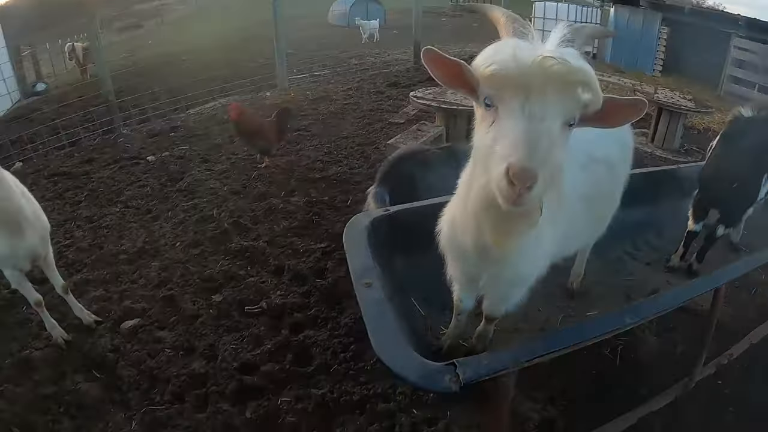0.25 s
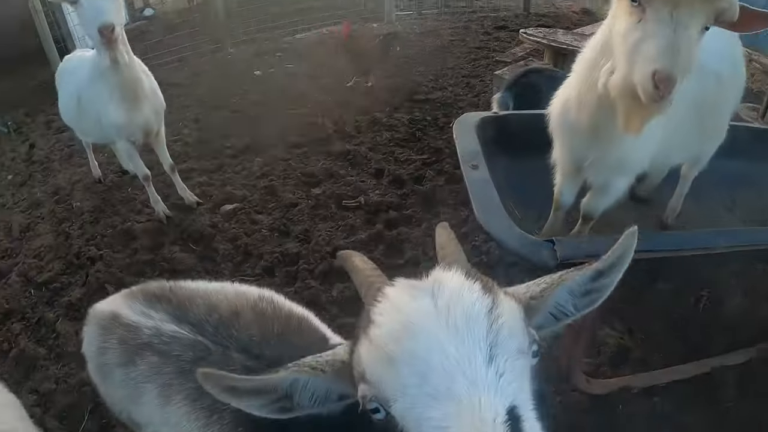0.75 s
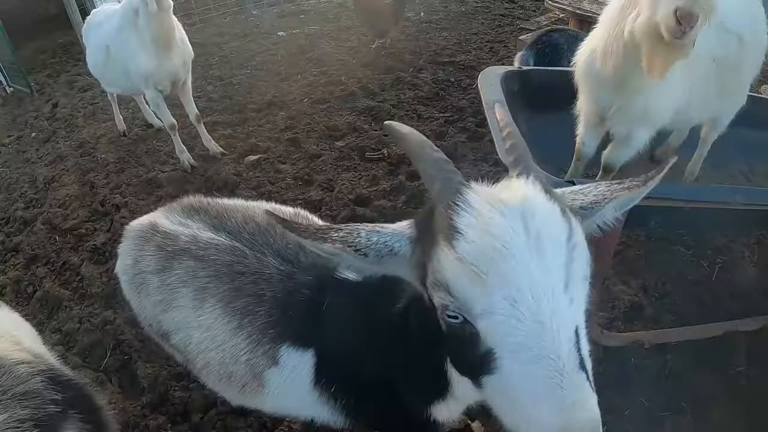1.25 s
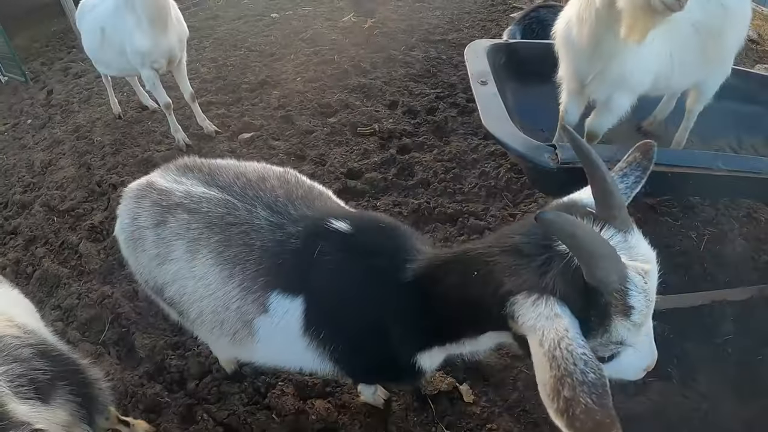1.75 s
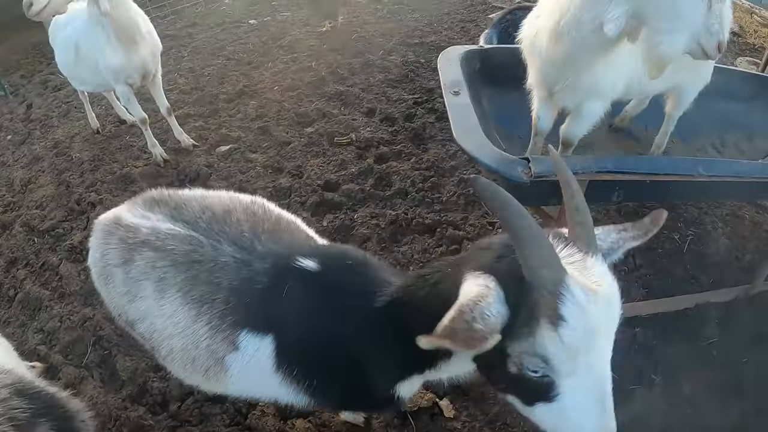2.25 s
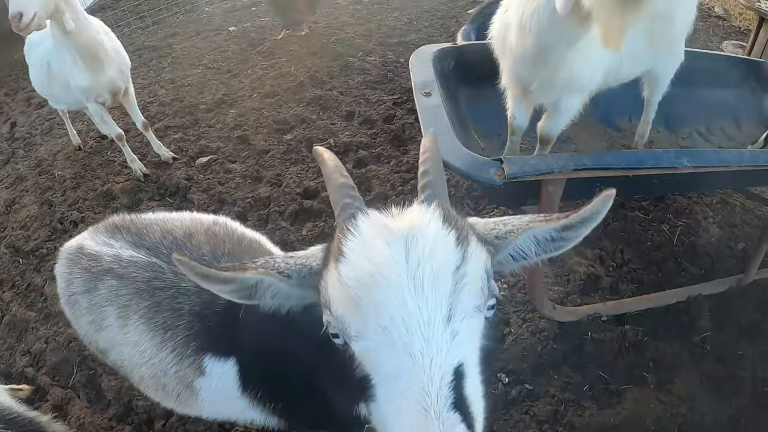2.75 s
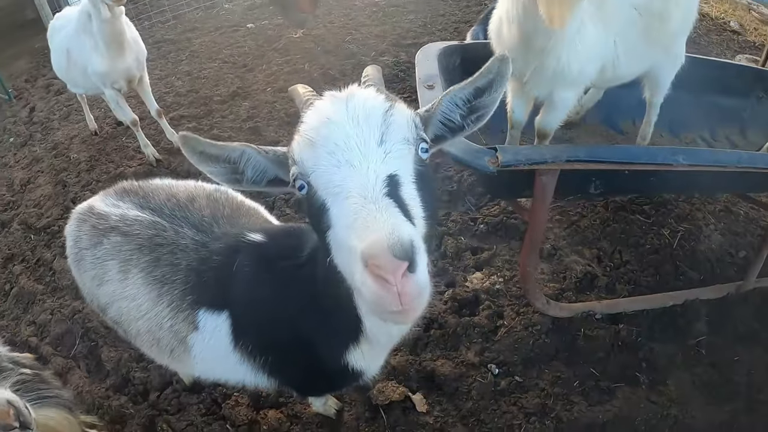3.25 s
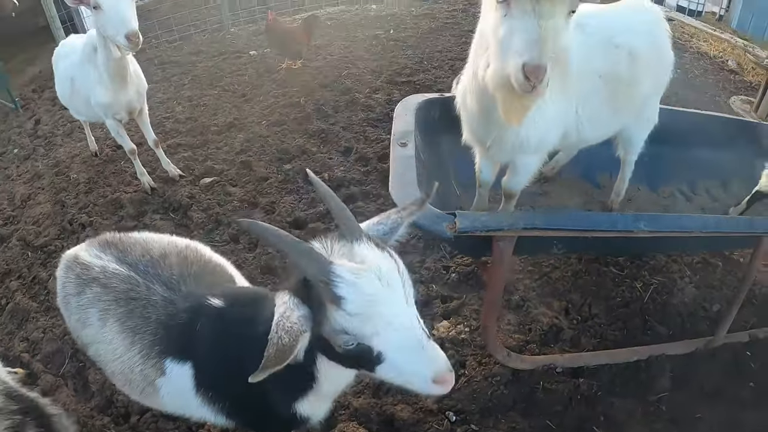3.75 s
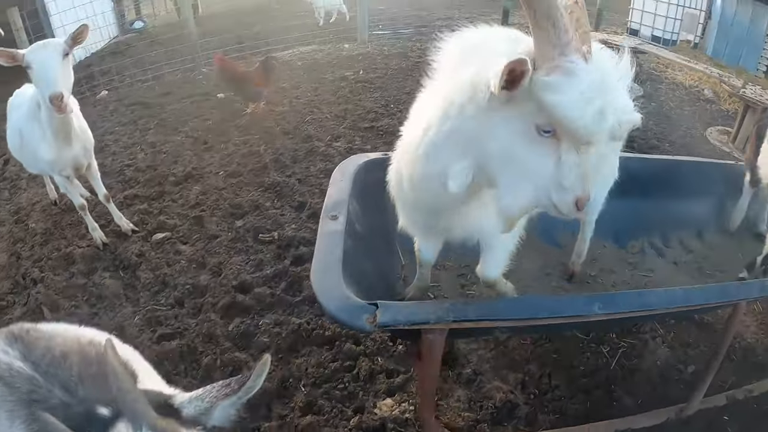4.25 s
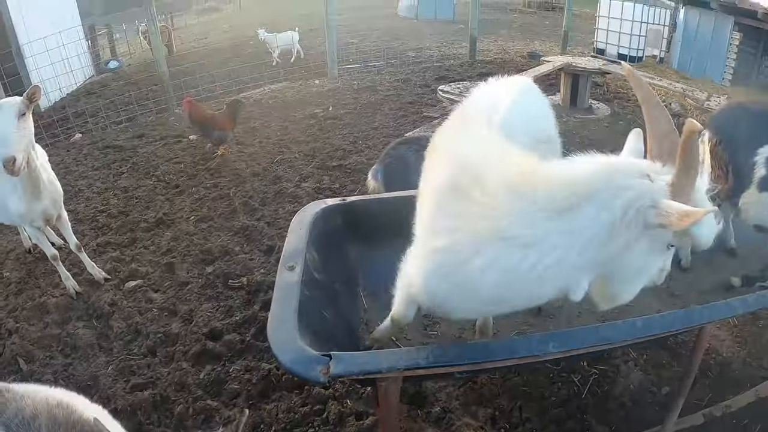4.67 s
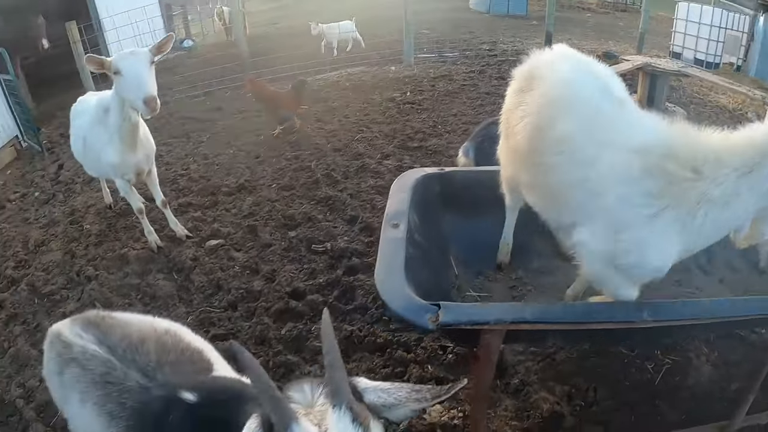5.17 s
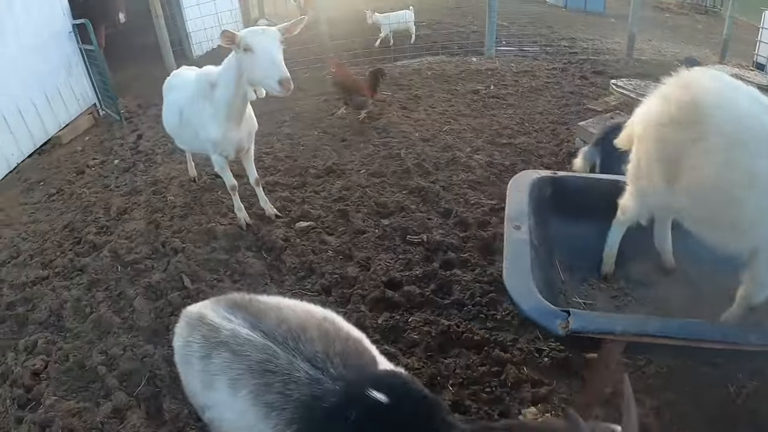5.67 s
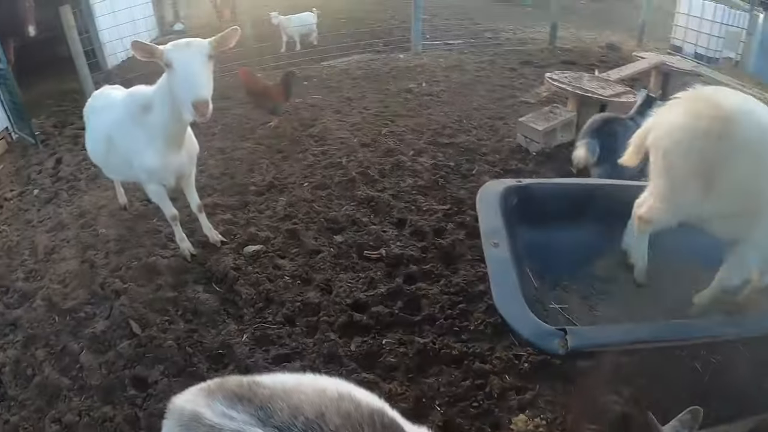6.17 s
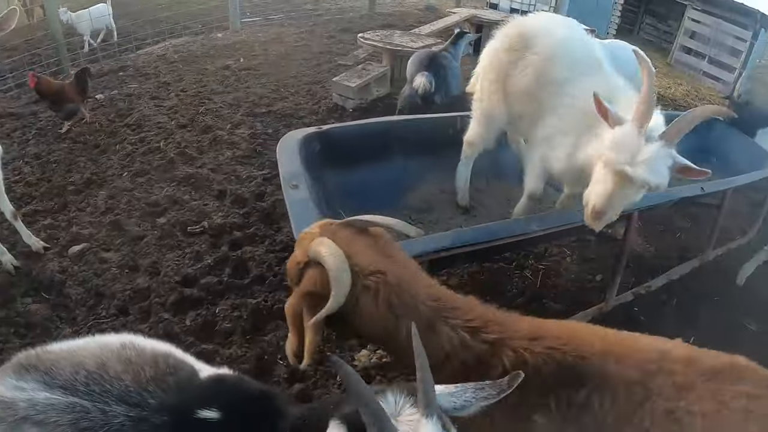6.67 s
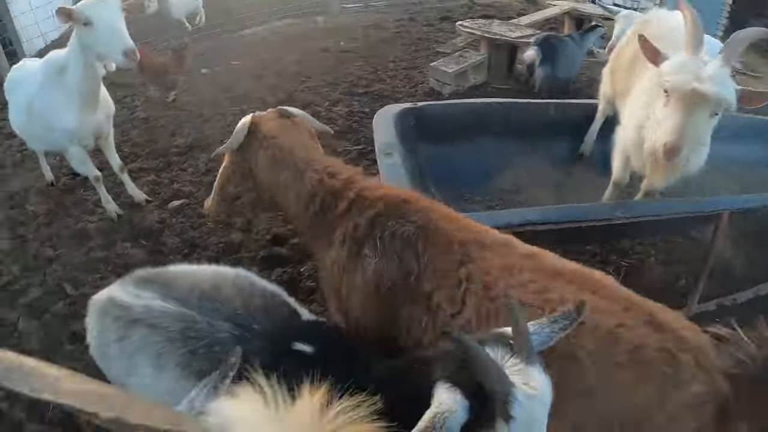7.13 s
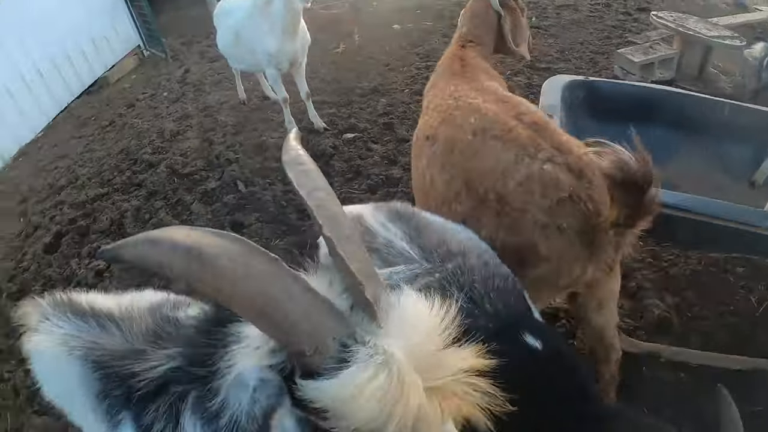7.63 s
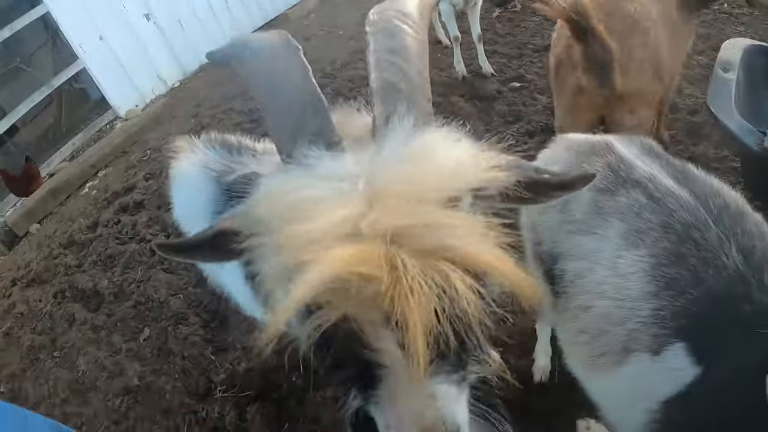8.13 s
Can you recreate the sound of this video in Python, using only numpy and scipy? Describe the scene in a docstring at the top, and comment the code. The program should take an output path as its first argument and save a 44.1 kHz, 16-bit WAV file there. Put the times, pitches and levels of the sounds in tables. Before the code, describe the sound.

Outdoors in a dirt yard with steady quiet air noise and barely any echo. A soft bleat at 0-0.35 s comes with tiny squeaks and a run of light plastic knocks until 0.9. From 0.45 to 1.3 a loud, raspy, strongly throbbing bleat rises very close, peaking near 0.85. A weaker nasal one follows to 1.75, then a hoarse stuttering bleat to 2.7, with knocks at 2.0 and 2.5. A clear, strong, steadier bleat swells at 3.2 and drops by 3.7; a short mutter leads to a shrill bleat at 4.0-4.5, then a soft shaky one to 5.4. Hooves thump the hollow trough from 4.3, strongly at 5.05, 5.45 and 6.35, with low rumble and dirt scuffs. At 6.5-7.5 a long, smoother bleat overlaps faint, rough distant ones. A booming knock at 7.75 rattles in slowing rebounds with clicks; two little squeaks at 8.0 and final knocks at 8.2 close.

```python
"""A soft bleat is heard first; then goats bleat in turn, near and farther off, about eleven throbs a second.
Each voice is a harmonic series with gated hiss, modulated in level and pitch and shaped by throat resonances.
Hooves strike a big plastic trough, a sum of decaying modes over dense noise, which booms and rumbles.
Scuffs in the dirt are clumped noise grains, squeaks are brief frequency-modulated tones,
and steady filtered noise is the open air."""
import sys
import numpy as np
from scipy import signal
from scipy.fft import rfft, irfft, next_fast_len
from scipy.io import wavfile
from scipy.ndimage import uniform_filter1d

SR = 44100
rng = np.random.default_rng(int(sys.argv[2]) if len(sys.argv) > 2 else 0)


def dump_mix(stems):
    """Bounce the given channels to the path in sys.argv[1] as a 16-bit WAV at rate SR."""
    frames = np.atleast_2d(stems).T  # one column per channel
    limited = np.clip(frames, -1, 1)  # hard clip at full scale
    pcm = np.round(limited * 32767).astype(np.int16)
    wavfile.write(sys.argv[1], SR, pcm)


N = 370440  # samples

# Course of each bleat through the crests of its throbs; throb depth is before the low-harmonic factor.
# Columns: t/s, f/Hz, level/dB, upper over lower harmonics/dB, throb depth/dB
OPENING_COURSE = [(0, 413, -42, -1, 9), (.16, 420, -39.5, -3, 8), (.25, 413, -40.5, -2, 5),
                  (.355, 358, -46, 0, 2)]
LOUD_COURSE = [(.45, 410, -26, -5, 16), (.5, 425, -24.5, -5, 16), (.59, 488, -21, -5, 16),
               (.72, 504, -22.5, -5, 20), (.775, 462, -21, 9, 9), (.84, 504, -16, 5, 20),
               (.92, 468, -17, 6, 20), (1.02, 458, -19, 6, 19), (1.11, 412, -23.5, 8, 14),
               (1.2, 386, -31.5, 7, 9), (1.29, 365, -40, 4, 3)]
NASAL_COURSE = [(1.27, 440, -31, -19, 13), (1.395, 452, -33, -3.5, 16), (1.556, 470, -28.5, -4, 20),
                (1.65, 452, -31.5, -3, 18), (1.77, 408, -39, 5, 24)]
STUTTER_COURSE = [(1.765, 480, -27, -2.5, 28), (1.82, 392, -26, -2, 28), (1.917, 417, -23, 1, 24),
                  (2.1, 447, -20.5, -1.5, 28), (2.2, 437, -26, 2, 21), (2.39, 432, -29, 2.5, 12),
                  (2.58, 402, -36, 4, 12), (2.68, 337, -33.5, -3, 13), (2.74, 325, -35, -3, 14)]
CLEAR_COURSE = [(2.75, 320, -25, -5.5, 5), (2.825, 320, -26, -5, 13), (2.865, 398, -25.5, 0, 7),
                (2.96, 411, -23.5, 1, 5), (3.13, 437, -17, 2, 8), (3.24, 442, -15.5, 1.5, 11),
                (3.41, 419, -21.5, 3.5, 8), (3.52, 409, -20, 1.5, 6), (3.615, 390, -22.5, 1.5, 3),
                (3.72, 255, -40, 4, 6)]
MUTTER_COURSE = [(3.795, 335, -31, -8, 20), (3.85, 358, -30, -8, 22), (3.925, 424, -25.5, -13, 24),
                 (3.985, 432, -26, -13, 24)]
SHRILL_COURSE = [(3.98, 444, -35, 1, 15), (4.11, 444, -20.5, 5.5, 19), (4.2, 461, -17, 2.5, 19),
                 (4.285, 467, -21, 4.5, 16), (4.375, 405, -27.5, 5, 9), (4.5, 365, -40, -6, 9)]
SOFT_COURSE = [(4.665, 315, -35, -4, 16), (4.815, 404, -37, 9.5, 19), (4.91, 428, -35.5, 11, 18),
               (5.01, 424, -31, 2, 18), (5.2, 426, -34.5, 5, 20), (5.3, 386, -39.5, 4.5, 20),
               (5.44, 275, -47, 2, 6)]
FAR_COURSE = [(6.43, 480, -45, 0, 2), (6.57, 479, -41, 0, 4), (7.29, 457, -38, 1, 2),
              (7.38, 466, -36, 3, 3), (7.49, 425, -53, 0, 8)]
LONG_COURSE = [(6.57, 395, -37, -3, 11), (6.71, 432, -36, -2.5, 12), (6.79, 474, -24, -2, 8),
               (6.885, 478, -25, 3.5, 5), (6.985, 466, -23, 1.5, 3.5), (7.125, 470, -21, 3.5, 1),
               (7.215, 448, -21.5, -3, 1), (7.25, 412, -28, 0, 1), (7.28, 340, -42, 0, 1)]
BEHIND_COURSE = [(6.86, 395, -33, 0, 18), (7.01, 398, -32, 0, 15), (7.11, 413, -36, 0, 9),
                 (7.2, 390, -35, 0, 9), (7.34, 345, -41, 0, 10)]

# Throat and mouth response for each way of calling. Columns: f/Hz, relative level/dB
OPENING_THROAT = [(400, -6.5), (810, 3), (1210, 6), (1620, -16), (2020, -12), (2430, -8), (2830, -0.5),
                  (3240, -17), (3640, -7.5), (4700, -24), (6000, -42), (7900, -64), (9600, -65),
                  (13000, -81.7)]
LOUD_THROAT = [(440, -6), (890, -3.5), (1330, -13), (1780, -24), (2270, -12.5), (2670, -12), (3110, -12),
               (3560, -12), (4400, -20.5), (5300, -32.5), (6100, -26), (7900, -47), (9600, -46),
               (13000, -69)]
NASAL_THROAT = [(450, -9.5), (900, -20.5), (1340, -18), (1790, -14.5), (2240, 0), (2690, -5.5), (3130, 8),
                (3580, -3), (4030, -7), (4700, -16), (6000, -26), (7900, -38), (9600, -36.5), (13000, -69)]
STUTTER_THROAT = [(420, -13), (840, -10.5), (1260, -5.5), (1680, -16), (2100, -16), (2520, -13),
                  (2940, -12), (3360, -25.5), (3780, -17.5), (4700, -37), (6000, -36.5), (7900, -44),
                  (9600, -45), (13000, -70)]
CLEAR_THROAT = [(400, -17.5), (640, -0.5), (850, -5.5), (980, -12), (1170, -3.5), (1250, -2), (1670, -17.5),
                (2090, -22), (2500, -13.5), (2920, -11), (3340, -21.5), (3800, -16.5), (4150, -20),
                (4700, -32), (5300, -30), (5900, -40), (6700, -41), (7900, -57), (9500, -48.5),
                (13000, -79)]
SHRILL_THROAT = [(440, -16), (890, -4), (1330, -18.5), (1770, -29.5), (2220, -12.5), (2660, -13),
                 (3110, -14.5), (3550, -7.4), (3990, -15.5), (4700, -25), (6000, -32), (7900, -49),
                 (9600, -58), (13000, -71.7)]
SOFT_THROAT = [(400, -2.5), (810, -7), (1210, -5), (1610, -9), (2010, -15.5), (2420, -19.5), (2820, -6),
               (3220, -24.5), (3620, -16), (4700, -33), (6000, -34), (7900, -51.5), (9600, -46),
               (13000, -63.7)]
LONG_THROAT = [(460, -11.5), (920, -7), (1380, -14.5), (1840, -23), (2300, -12), (2750, -11), (3210, -11.5),
               (3670, -10.3), (4130, -18.5), (4700, -26.5), (6000, -30.8), (7900, -51.5), (9600, -60),
               (13000, -78)]
FAR_THROAT = [(460, -15.5), (930, -8.5), (1400, -15.5), (1880, -6), (2350, -21.5), (2800, -12.5),
              (4700, -28.5), (8000, -47), (13000, -63)]

# States of the vocal folds. Columns: base pitch jitter [share], relative hiss level/dB, tremor [share],
# shimmer of single upper harmonics/dB, harmonic number at which phase blur reaches 1 rad rms
CLEAN_FOLDS = (.0015, -27, .0005, 1.2, 21)
HUSKY_FOLDS = (.003, -17, .002, 2.8, 24)
RASPY_FOLDS = (.006, -10, .0065, 3.8, 16)
HOARSE_FOLDS = (.0055, -10, .005, 3.5, 20)
RAGGED_FOLDS = (.012, -4, .004, 4, 14)

# Hooves and horns on the trough. Columns: t/s, level/dB, boom over body/dB, rebounds [count]
BLOWS = [(.307, -36, -11, 0), (.346, -35, -12, 0), (.387, -25.5, -18, 0), (.566, -30, -16, 0),
         (.615, -30, -22, 0), (.659, -28, -16, 0), (.751, -23, -21, 0), (.842, -28, -13, 0),
         (.885, -31.5, -24, 0), (2.034, -26, -10, 0), (2.536, -26, -3, 0), (2.661, -36, -7, 0),
         (4.29, -28.5, -8, 0), (4.452, -24, 4, 0), (4.557, -48, 20, 0), (4.612, -25.5, 0, 0),
         (4.84, -32, 0, 0), (4.93, -30, -1, 0), (5.042, -19, -7, 0), (5.232, -32, 2, 0),
         (5.448, -17.5, -4, 1), (5.629, -33, 6, 0), (5.819, -26, 3.5, 3), (5.998, -37, -3, 0),
         (6.172, -52, 20, 0), (6.295, -42, 0, 0), (6.365, -16, -4, 0), (6.507, -23, 4, 0),
         (6.91, -27.5, 10, 0), (7.761, -17.5, 4, 4), (8.163, -23, -2, 0), (8.174, -20, 0, 0),
         (8.253, -32, 2, 0), (8.303, -36, 6, 0), (8.375, -36.5, 6, 0)]
# Sharp clicks of something hard. Columns: t/s, level/dB
HARD_CLICKS = [(.389, -42), (4.29, -37), (5.448, -42), (6.91, -43), (7.797, -37.5), (7.816, -39),
               (7.849, -45), (7.904, -46), (8.174, -47), (8.253, -49)]
# Modes of the plastic trough before small shifts. Columns: f/Hz, relative level/dB, t60/s
TROUGH_MODES = [(118, -16, 0.16), (170.4, -4.5, 0.24), (201, 1, 0.19), (225.3, -3.5, .3),
                (258.9, 1.5, 0.13), (294.8, -4.5, 0.18), (342, 9.5, 0.1), (443, 4.5, 0.22), (498, 8, 0.13),
                (587.6, 9, 0.099), (643, 0, 0.092), (672, -2, 0.23), (868, -23.5, 0.21), (884, -36.5, 0.11),
                (1249, -24, 0.084), (1427, 4, 0.15), (1848, 9, 0.05)]
# Trough rumble as hooves shift in it. Columns: t/s, level/dB
RUMBLE_COURSE = [(0, -50), (.7, -49), (1.5, -55), (2.3, -50), (3.1, -51), (3.7, -46), (4.4, -41),
                 (5.4, -46), (6, -42), (6.7, -50), (7.1, -43), (7.7, -58), (8.4, -34)]
# Hooves scuffing the dirt. Columns: t/s, length/s, level/dB before the fades
DIRT_SCUFFS = [(0.33, 0.22, -40), (1.948, 0.9, -44.5), (4.534, 0.18, -43), (4.743, 0.47, -45),
               (5.361, 0.071, -54), (5.458, 0.13, -45), (5.615, 0.48, -56), (5.989, 0.127, -50),
               (6.512, 0.25, -51.5), (7.555, 0.16, -44.5), (8.166, 0.25, -46)]
# Spectrum of a scuff. Columns: f/Hz, relative level/dB
GRIT_SPECTRUM = [(150, -25), (500, 0.5), (1200, 9), (3000, 2.5), (5500, -6), (8000, -19), (11000, -23.5),
                 (14500, -39)]
# Short squeaks. Columns: t/s, length/s, centre f/Hz, level/dB
SQUEAK_TONES = [(0.1, 0.023, 1044, -38), (.124, .016, 1170, -33.5), (0.322, 0.095, 557, -35),
                (.388, 0.04, 486, -26.5), (0.42, 0.077, 514, -37), (.797, .028, 1194, -22.5),
                (8.007, 0.019, 1137, -27.5), (8.05, 0.022, 1120, -31.5)]
# Spectrum of the open air. Columns: f/Hz, relative level per Hz/dB
AIR_SPECTRUM = [(15, -37), (25, -18.5), (85, -2), (212, -16.5), (308, -8.5), (424, -3), (569, -7.5),
                (849, -5.5), (1020, -12), (1270, -8), (3890, -25.5), (9390, -43), (12300, -52),
                (14800, -77.5)]

# The trough rocks on its frame: first gap, growth of each gap, first rebound below the blow, further loss
REBOUND_S, REBOUND_GROWTH, REBOUND_DB, REBOUND_LOSS_DB = .029, 1.15, -6, -2.3
CRACK_DB, TICK_DB = -14, -31  # upper registers of a blow, against its body
SETTLE_DB, SETTLE_RISE_S, SETTLE_T60 = -17, .04, .6  # rumble that each blow leaves behind
AIR_DB = -46.5
EDGE_HZ = 14800


def bleat(course, throat, folds, crest_s, period_s, slowing=0., hold=2., lean=0., sag=.005, lag=0.,
          arch=2., low_dip=1.):
    """Source-filter principle: throbbing vocal folds make harmonics and gated hiss that pass the throat.

    Throbs start at crest_s, each a share `slowing` longer; `hold` widens crests, `lean` hastens their fall.
    Pitch drops by `sag` (share per dB of depth) between crests and peaks `lag` of a throb late.
    `arch` flattens the pitch peaks; `low_dip` multiplies the throb depth of the low harmonics.
    """
    s, crest_hz, level_db, bright_db, depth_db = np.transpose(course)
    jitter, hiss_db, tremor, shimmer_db, blur_from = folds
    t = np.arange(s[0], s[-1], 1 / SR)
    number = np.arange(-2, 16)
    crest_times = crest_s + period_s * number * (1 + slowing * number / 2)
    throb = np.interp(t, crest_times, number)
    depth = np.interp(t, s, depth_db)

    # the pitch arches over each throb and sags between them
    pitch_dip = sag * depth * abs(np.sin(np.pi * (throb - lag))) ** arch
    hz = uniform_filter1d(np.interp(t, s, crest_hz) * (1 - pitch_dip), size=400)
    # the larynx squeezes between crests; low and high harmonics drop by different amounts
    squeeze = abs(np.sin(np.pi * throb + lean * np.sin(np.pi * throb) ** 2)) ** hold
    low = amp(np.interp(t, s, level_db) - low_dip * depth * squeeze)
    high = amp(np.interp(t, s, level_db + bright_db) - depth * squeeze)

    # a second, slower vibration near 108 Hz puts sidebands on the upper harmonics
    shake = np.sin(2 * np.pi * np.cumsum(108 * (1 + 0.2 * wander(len(t), 30))) / SR)
    unsteady = jitter * (1 + squeeze * depth / 9) * wander(len(t), 260) + tremor * shake
    turns = np.cumsum(hz * (1 + unsteady)) / SR

    voice = np.zeros(len(t))
    for k in range(1, 33):
        blur = min((k / blur_from) ** 3, 2) * wander(len(t), 150)
        smear = k ** 2 / (2 * np.pi)  # the throat smears each pulse
        harmonic = np.sqrt(2) * np.cos(2 * np.pi * k * turns - smear + blur)
        # jaw and tongue move, so the upper harmonics swell and fade one by one
        sway_db = shimmer_db * min(k / 6, 1) * wander(len(t), 22)
        level = low if k < 5 else high
        voice += level * amp(read(throat, k * hz) + sway_db) * harmonic

    # hiss is strongest at the start of each fold cycle
    puffs = rng.standard_normal(len(t)) * (1.2 + np.exp(-(turns % 1) / 0.1))
    hiss = evened(band(colour(puffs, throat), 380, 15000))
    high_hiss = high * band(hiss, 1900, 15000)
    low_hiss = .5 * low * band(hiss, 300, 1900)
    voice += amp(hiss_db) * (high_hiss + low_hiss)
    sound = np.zeros(N)
    add(sound, t[0], voice * signal.windows.tukey(len(t), 0.02 * SR / len(t)))
    return sound


def goats():
    """Direct-to-reverberant ratio gives distance: the closest bleats carry almost no echo; some overlap."""
    near = bleat(LOUD_COURSE, LOUD_THROAT, RASPY_FOLDS, crest_s=.497, period_s=.0789, slowing=.031,
                 hold=2.5, lean=.15, sag=.0062, lag=.11, arch=1.1, low_dip=1.45)
    near += bleat(STUTTER_COURSE, STUTTER_THROAT, HOARSE_FOLDS, crest_s=1.816, period_s=.0962, slowing=.001,
                  hold=2.0, lean=.15, sag=.0085, lag=.04, arch=2.2, low_dip=1.15)
    near += bleat(CLEAR_COURSE, CLEAR_THROAT, CLEAN_FOLDS, crest_s=2.79, period_s=.0832, slowing=.018,
                  hold=2.1, lean=.1, sag=.009, lag=.03, arch=2.1, low_dip=1.4)

    farther = bleat(OPENING_COURSE, OPENING_THROAT, CLEAN_FOLDS, crest_s=.067, period_s=.086,
                    hold=1.7, sag=.009, low_dip=.9)
    farther += bleat(NASAL_COURSE, NASAL_THROAT, HOARSE_FOLDS, crest_s=1.311, period_s=.0824,
                     hold=2.7, lean=.15, sag=.0038, lag=.03, arch=1.5, low_dip=1.05)
    farther += bleat(MUTTER_COURSE, SHRILL_THROAT, HUSKY_FOLDS, crest_s=3.842, period_s=.093,
                     hold=2.1, sag=.004, lag=.25)
    farther += bleat(SHRILL_COURSE, SHRILL_THROAT, RASPY_FOLDS, crest_s=4.029, period_s=.0855,
                     hold=1.9, lean=.05, sag=.004, lag=-.14, arch=2.1, low_dip=1.1)
    farther += bleat(SOFT_COURSE, SOFT_THROAT, HOARSE_FOLDS, crest_s=4.714, period_s=.0975,
                     hold=1.8, sag=.01, lag=.09, arch=2.4, low_dip=.9)
    farther += bleat(LONG_COURSE, LONG_THROAT, HUSKY_FOLDS, crest_s=6.612, period_s=.092,
                     hold=1.7, sag=.012, lag=-.02, low_dip=1.2)
    farther += bleat(BEHIND_COURSE, SOFT_THROAT, RAGGED_FOLDS, crest_s=6.91, period_s=.095,
                     hold=1.6, sag=.009)
    farther += bleat(FAR_COURSE, FAR_THROAT, RAGGED_FOLDS, crest_s=6.48, period_s=.089, sag=.004)

    near_echo = yard(near, t60=.45, wet_db=-25)
    far_echo = yard(farther, t60=.45, wet_db=-18)
    return near + near_echo + farther + far_echo


def yard(x, t60, wet_db):
    """Reverberation by convolution with decaying noise: a faint, dull echo from ground, fence and sheds."""
    t = np.arange(SR // 2) / SR
    reflections = rng.standard_normal(len(t)) * (t > .006) * amp(-60 * t / t60)
    tail = band(reflections, 150, 4700, order=1)
    return amp(wet_db) * signal.fftconvolve(x, tail / np.linalg.norm(tail))[:N]


def knocks():
    """Impact excitation of the trough; after some blows it rocks back, ever slower and softer."""
    out = np.zeros(N)
    for s, db, boom_db, count in BLOWS:
        add(out, s, amp(db) * blow(boom_db))
        for k in range(round(count)):
            s = s + REBOUND_S * REBOUND_GROWTH ** k
            rebound_db = db + REBOUND_DB + k * REBOUND_LOSS_DB
            add(out, s, amp(rebound_db) * blow(boom_db))
    for s, db in HARD_CLICKS:
        add(out, s, amp(db) * tick())
    return out


def blow(boom_db):
    """Modal response by register: tick and crack come at once, the boom of the whole trough swells later."""
    boom = ring(120, 330, t60=0.1, rise=0.006, tail_db=-9.5, tail_t60=.4, clatter=0.47)
    body = ring(255, 1110, t60=0.079, rise=0.0005, tail_db=-24.5, tail_t60=0.52, clatter=1.01)
    crack = ring(1200, 2430, t60=0.081, rise=0.00063, tail_db=-19.5, tail_t60=0.19, clatter=1.6)
    return amp(boom_db) * boom + body + amp(CRACK_DB) * crack + amp(TICK_DB) * tick()


def tick():
    """A brief contact excites high frequencies: the sharp top of an impact."""
    top = ring(3000, 13000, t60=0.019, rise=0.0011, tail_db=-13, tail_t60=0.17, clatter=1.5)
    return colour(top, [(3000, 10), (5500, 1.5), (8000, -12.5), (13000, -31)])


def ring(lo_hz, hi_hz, t60, rise, tail_db, tail_t60, clatter):
    """Modal superposition: decaying sines, weighted by where the blow lands, over a dense clatter."""
    t = np.arange(SR // 2) / SR
    chosen = [mode for mode in TROUGH_MODES if lo_hz < mode[0] < hi_hz]
    hz, db, life = np.reshape(chosen, (-1, 3)).T[:, :, None]
    # the goat's weight shifts the modes a little from step to step
    hz = hz * rng.uniform(.96, 1.04, hz.shape)
    weight = rng.choice([-1, 1], hz.shape) * rng.uniform(0.36, 1, hz.shape)
    modes = (weight * amp(db - 60 * t / life) * np.sin(2 * np.pi * hz * t)).sum(0)
    decay = amp(-60 * t / t60) + amp(tail_db - 60 * t / tail_t60)
    dense = band(rng.standard_normal(len(t)) * decay, lo_hz, hi_hz, order=3)
    sound = (evened(modes) + clatter * evened(dense)) * (1 - np.exp(-t / rise))
    return sound / np.sqrt(np.mean(sound[:SR * 3 // 100] ** 2))  # rms 1 over the first 30 ms


def shuffle():
    """Random excitation of a resonator: small shifts of weight keep the trough rumbling, more after blows."""
    steps = rng.standard_normal(N) * amp(5 * wander(N, 14))
    rumble = colour(steps, [(40, -21), (110, -0.5), (170, 6.5), (225, 5), (320, -5), (500, -5),
                            (900, -10), (2000, -36.5), (6000, -93.5)])
    level = amp(np.interp(np.arange(N) / SR, *np.transpose(RUMBLE_COURSE)))
    t = np.arange(SR) / SR
    settle = np.minimum(t / SETTLE_RISE_S, 1) * amp(SETTLE_DB - 60 * t / SETTLE_T60)
    for s, db, boom_db, _ in BLOWS:
        add(level, s, amp(db + boom_db) * settle)
    return level * evened(rumble)


def scuffs():
    """Granular friction: hooves drag through grit as noise clumped by fast and slow level changes."""
    out = np.zeros(N)
    for s, length, db in DIRT_SCUFFS:
        count = int(length * SR)
        clumps_db = 2.2 * wander(count, 900) + 3.6 * wander(count, 29)
        grains = rng.standard_normal(count) * amp(clumps_db)
        scuff = evened(colour(grains, GRIT_SPECTRUM))
        add(out, s, amp(db) * scuff * signal.windows.tukey(count, .5))
    return out


def squeaks():
    """Random frequency modulation: brief unsteady tones with a weak second harmonic."""
    out = np.zeros(N)
    for s, length, hz, db in SQUEAK_TONES:
        count = int(length * SR)
        phase = 2 * np.pi * np.cumsum(hz * (1 + 0.12 * wander(count, 370))) / SR
        tone = np.sin(phase) + 0.027 * np.sin(2 * phase)
        add(out, s, amp(db) * evened(tone * np.hanning(count)))
    return out


def open_air():
    """Stationary broadband noise: white noise shaped by the air spectrum."""
    return amp(AIR_DB) * evened(colour(rng.standard_normal(N), AIR_SPECTRUM))


def amp(db):
    """Logarithmic level law: decibels to amplitude gain."""
    return 10 ** (np.asarray(db) / 20)


def evened(x):
    """Power normalisation: scales to rms 1."""
    return x / np.sqrt(np.mean(x ** 2) + 1e-20)


def read(points, hz):
    """Linear interpolation of a level on a log-frequency axis."""
    f, value = np.transpose(points)
    return np.interp(np.log(hz + 1), np.log(f + 1), value)


def add(mix, s, sound):
    """Linear superposition: adds a sound into the mix, in place, from time s."""
    start = round(s * SR)
    sound = sound[max(-start, 0):]
    part = mix[max(start, 0):][:len(sound)]
    part += sound[:len(part)]


def colour(x, points):
    """Spectral multiplication: filters by a magnitude response in the frequency domain."""
    size = next_fast_len(len(x))
    gain = amp(read(points, np.fft.rfftfreq(size, 1 / SR)))
    return irfft(rfft(x, size) * gain, size)[:len(x)]


def band(x, lo_hz, hi_hz, order=2):
    """Causal band-pass filtering with a Butterworth response."""
    edges = [lo_hz, min(hi_hz, SR / 2 - 1)]
    return signal.sosfilt(signal.butter(order, edges, "band", fs=SR, output="sos"), x)


def wander(count, hz):
    """Low-passed noise: a smooth random course of rms 1, changing at up to about hz."""
    sos = signal.butter(2, hz, fs=SR, output="sos")
    noise = rng.standard_normal(count + SR // 10)  # the extra 0.1 s lets the filter settle
    return evened(signal.sosfilt(sos, noise)[-count:])


def scene():
    """Superposition of goats, squeaks, trough, dirt and open air in one channel."""
    return (goats() + squeaks() + knocks() + shuffle() + scuffs() + open_air())[None]


def record(dry):
    """Band limitation: a linear-phase low-pass filter removes the extreme treble."""
    lowpass = signal.firwin(511, EDGE_HZ, window=("kaiser", 9), fs=SR)
    return signal.oaconvolve(dry, lowpass[None], "same")


dry = scene()
out = record(dry)
dump_mix(out)
```